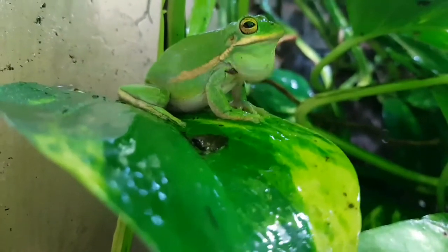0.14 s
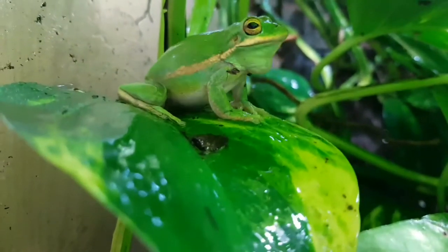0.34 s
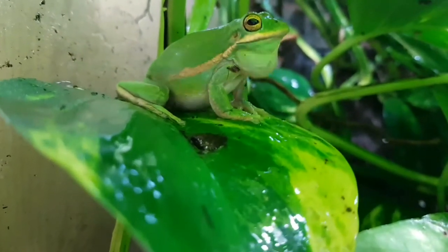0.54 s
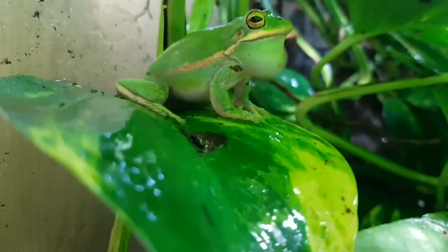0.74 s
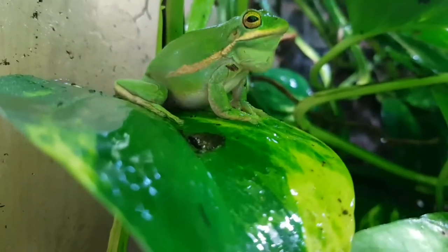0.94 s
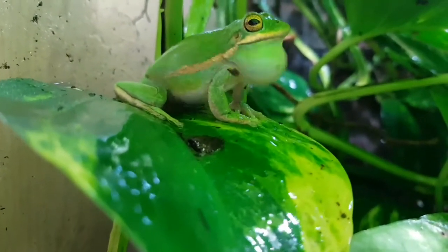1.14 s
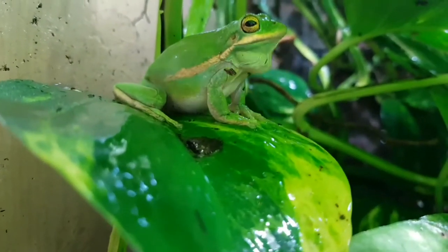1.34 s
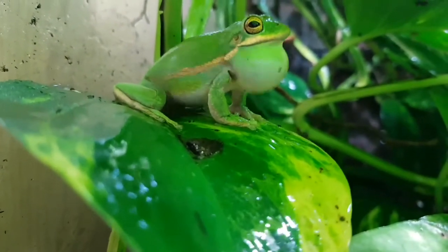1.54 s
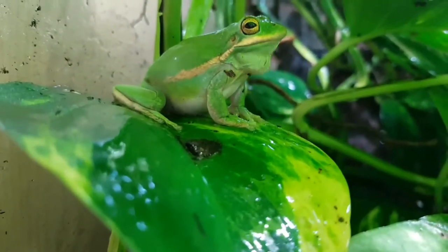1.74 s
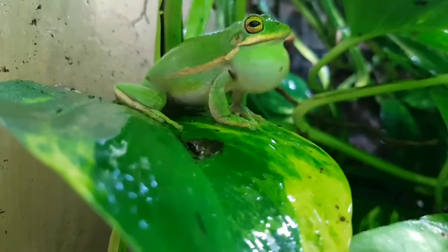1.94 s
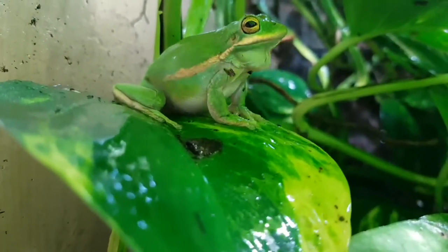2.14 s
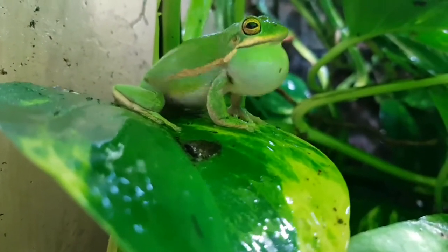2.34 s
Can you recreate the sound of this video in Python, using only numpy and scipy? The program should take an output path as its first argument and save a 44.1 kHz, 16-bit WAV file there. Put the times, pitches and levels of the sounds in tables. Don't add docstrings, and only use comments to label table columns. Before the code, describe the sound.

A single tree frog close to a stereo microphone gives six short, loud, rough barks, evenly spaced, each preceded by a faint throat click, with a thin tail from nearby walls and a quiet low floor.

```python
import sys
import numpy as np
from scipy import signal
from scipy.fft import rfft, irfft
from scipy.io import wavfile
from scipy.ndimage import uniform_filter1d, minimum_filter1d

SR = 44100
rng = np.random.default_rng(int(sys.argv[2]) if len(sys.argv) > 2 else 0)


def master_out(mix):
    frames = np.transpose(np.atleast_2d(mix))
    ceiling = np.clip(frames, -1, 1)
    pcm = np.round(ceiling * 32767).astype(np.int16)
    wavfile.write(sys.argv[1], SR, pcm)


def volts_from_decibels(level):
    exponent = np.asarray(level, float) / 20
    return 10 ** exponent


N = 105840
LEAD = SR // 2

# start in [s], length in [s], effort in [dB], top pulse rate in [Hz],
# time into the bark when the upper band drops in [s].
BARKS = [
    (0.1369, .070, -11, 397, 0.055),
    (0.5221, .073, -10.5, 459.2, .041),
    (0.8983, 0.074, -10, 461, .048),
    (1.2828, 0.08, -11.5, 450, 0.058),
    (1.6713, 0.085, -11, 458, 0.0565),
    (2.0704, 0.08, -11, 478.5, .052),
]
# start in [s], peak in [dB].
THROAT_CLICKS = [
    (.115, -38),
    (.119, -41),
    (.5023, -37),
    (.506, -43),
    (.880, -37),
    (1.266, -42),
    (1.271, -36),
    (1.6523, -37),
    (2.050, -37),
]
# start in [s], peak in [dB].
LEAF_TICKS = [
    (0.438, -48.5),
    (1.986, -57.5),
]
# centre in [Hz], width in [Hz], level in [dB].
LOW_MODES = [(510, 120, -23.5), (666, 190, -20), (988.4, 170.3, 0.27), (1120.4, 153, -3), (1315, 174, -2),
             (1476.6, 175, -6)]
# centre in [Hz], width in [Hz], level in [dB].
UPPER_MODES = [(1818, 246, 1), (2034, 128, -4), (2176, 258, -3.7), (2326, 160, 0.4)]
# centre in [Hz], width in [Hz], level in [dB].
SHRILL_MODES = [(2645, 170, -9), (2982, 300, -10), (3340, 360, -16.5), (3817, 310, -21.5), (4275, 350, -26),
                (5033, 432, -23), (5982, 500, -27.5), (7376, 510, -42), (8950, 570, -41)]
# frequency in [Hz], gain in [dB].
SAC_RADIATION = [(100, -37), (300, -13.5), (500, -3.5), (800, 0.32), (6200, -2.37), (6700, -11), (7300, -6),
                 (9000, -8)]
# centre in [Hz], width in [Hz], depth in [0-1].
LEAF_NOTCHES = [(1610, 150, .75), (4790, 190, 0.5)]
# delay in [s], level in [dB].
NEAR_ECHOES = [(.0023, -19), (.0051, -22), (.0094, -21), (.015, -20.5), (.023, -22.5)]
# delay in [s], level in [dB].
SIDE_ECHOES = [(.0017, -18.5), (.0031, -14)]
# frequency in [Hz], lead of the left in [radians].
PORT_PHASE = [(100, 0.17), (700, 1.15), (2400, 1), (2800, 2.9), (3500, 4.44), (4500, 6.5), (6200, 16.2),
              (16000, 30)]
# frequency in [Hz], left over right in [dB].
PORT_BALANCE = [(60, 0.5), (150, 2), (380, -3.5), (950, 1), (2380, -4.5), (5980, -3.5), (15000, -1)]
# frequency in [Hz], time to fall 60 dB in [s].
ROOM_DECAY = [(400, 0.58), (1000, 0.47), (2000, 0.47), (3500, 0.43), (6000, 0.42), (10000, 0.22)]
# frequency in [Hz], level in [dB].
ROOM_COLOUR = [(400, 4.6), (1000, 0.5), (1500, 1.5), (2000, -.5), (3500, -5.5), (6000, 0.5), (10000, -5.5)]
# frequency in [Hz], density in [dB per Hz].
FLOOR_COLOUR = [(15, -27.5), (40, -11), (70, -6.5), (115, -2.5), (250, -10.5), (1000, -12.5), (5000, -30.5),
                (15000, -30)]
# frequency in [Hz], likeness in [0-1].
FLOOR_LIKENESS = [(30, .82), (200, .65), (600, .4), (3000, .2), (12000, .1)]


def evened(x):
    return x / np.sqrt(np.mean(x ** 2) + 1e-20)


def read(points, hz):
    f, value = np.transpose(points)
    return np.interp(np.log(hz + 1), np.log(f + 1), value)


def step(t, at, span):
    return .5 + .5 * np.tanh((t - at) / span)


def resonate(x, hz, width):
    turn = np.exp(2j * np.pi * np.cumsum(hz * np.ones(x.shape[-1])) / SR)
    r = np.exp(-np.pi * width / SR)
    smooth = signal.lfilter([(1 - r) ** 2], [1, -2 * r, r * r], x / turn)
    return 2 * (turn * smooth).real


def ring(x, modes):
    return sum((-1) ** k * volts_from_decibels(db) * resonate(x, hz, width) for k, (hz, width, db) in enumerate(modes))


def folds(t, rate_hz):
    wander_depth, jitter, shimmer_db, breath = .16, .08, 2.2, .15
    start_rate, rise_s, end_sag = .8, .015, .18
    draws = rng.standard_normal((80, 4))
    air_noise = rng.standard_normal((8000, 2))[:len(t)].T
    wander = evened(uniform_filter1d(draws[:, 0], size=6))
    law = start_rate + (1 - start_rate) * np.minimum(t / rise_s, 1) - end_sag * (t / t[-1]) ** 2
    gaps = np.clip(1 + wander_depth * wander + jitter * draws[:, 1], .3, 3)
    at = np.searchsorted(np.cumsum(rate_hz * law) / SR, np.cumsum(gaps) - gaps[0])
    keep = at < len(t)
    pulses = np.zeros((2, len(t)))
    pulses[:, at[keep]] = volts_from_decibels(shimmer_db * draws[keep, 2:].T)
    pulses[:, 0] = volts_from_decibels(4)
    puffs = signal.lfilter([1], [1, -.98], pulses) * air_noise
    return (1 - breath) * evened(pulses) + breath * evened(puffs)


def favour(x, start_hz, end_hz, u, width_hz, gain):
    return x + gain * resonate(x, start_hz + (end_hz - start_hz) * u, width_hz)


def bark(length, effort_db, rate_hz, drop_s):
    t = np.arange(0, length + 0.084, 1 / SR)
    u = np.minimum(t / length, 1)
    unswollen = 1 - step(t, 0.013, 0.0017)
    effort = volts_from_decibels(-3.5 * unswollen - 5 * ((u - 0.41) * 2) ** 2)
    low, high = folds(t, rate_hz) * (1 - step(t, length, .002)) * effort
    upper = volts_from_decibels(0.27 - 13.5 * unswollen - 9.5 * step(t, drop_s, 0.0025))
    snap_db, snap_s = 3, .004
    shrill_db = -5 * (1 - np.minimum(u / 0.35, 1)) + snap_db * step(t, length - 2 * snap_s, snap_s / 2)
    sound = ring(favour(low, 1311, 956, u, 260, 1.2), LOW_MODES)
    sound = sound + ring(upper * favour(high, 1764, 2324, u, 280, 2.2), UPPER_MODES)
    sound = evened(sound + ring(volts_from_decibels(3.5) * volts_from_decibels(shrill_db) * high, SHRILL_MODES))
    onset = np.minimum(t / 0.00026, 1)
    return volts_from_decibels(effort_db - 2.5) * onset * sound


def click(db, share_db):
    t = np.arange(1500) / SR
    smack = np.exp(-t / 0.0022) * rng.standard_normal(len(t)) * .08 + (t == 0)
    bands = zip(share_db, (LOW_MODES, UPPER_MODES, SHRILL_MODES))
    sound = sum(volts_from_decibels(g) * ring(smack, modes) for g, modes in bands)
    return volts_from_decibels(db) * sound / abs(sound).max()


def frog():
    out = np.zeros(N + 2 * LEAD)
    sounds = [(row[0], bark(*row[1:])) for row in BARKS]
    sounds += [(s, click(db, (0.1, 1.5, 11))) for s, db in THROAT_CLICKS]
    sounds += [(s, click(db, (-8, 0.1, 20.5))) for s, db in LEAF_TICKS]
    sounds += [(-0.27, bark(0.092, -11.5, 450, 0.04))]
    for s, sound in sounds:
        at = LEAD + round(s * SR)
        out[at:at + len(sound)] += sound
    return out[:N + LEAD]


def radiate(x):
    folded = irfft(np.log(volts_from_decibels(read(SAC_RADIATION, np.fft.rfftfreq(4096, 1 / SR)))))[:2049]
    folded[1:-1] *= 2
    return signal.oaconvolve(x, irfft(np.exp(rfft(folded, 4096))))[:len(x)]


def air():
    t = np.arange(N) / SR
    gate = np.zeros(N)
    for s, length, effort_db, *_ in BARKS:
        puff = volts_from_decibels(effort_db + 4.5 * np.exp(-abs(t - s) / .008))
        gate += puff * (t > s) * (1 - step(t, s + length, .002))
    a, b, shared = resonate(rng.standard_normal((3, N)), 11500, 11000)
    return volts_from_decibels(-51.5) * gate * evened(np.array([a + 0.94 * shared, b - 0.87 * shared]))


def leaf_shadow(x):
    for hz, width, depth in LEAF_NOTCHES:
        x = x - np.clip(depth, 0, 1) * resonate(x, hz, width)
    return x


def echo(hz, delay_s, db):
    return volts_from_decibels(db) * np.exp(-2j * np.pi * hz * delay_s)


def ports(x):
    hz = np.fft.rfftfreq(len(x), 1 / SR)
    near = 1 + sum(echo(hz, *e) for e in NEAR_ECHOES)
    side = np.array([echo(hz, *e) for e in SIDE_ECHOES])
    near = near + side * np.minimum(hz / 4000, 1)
    half = volts_from_decibels(read(PORT_BALANCE, hz) / 2) * np.exp(.5j * read(PORT_PHASE, hz))
    return irfft(rfft(x) * near * np.array([half, 1 / half]), len(x))


def room(x):
    taps = np.zeros((3, SR))
    slots = np.arange(300, SR - 20, 20)
    at = slots + rng.integers(0, 20, (3, len(slots)))
    np.put_along_axis(taps, at, rng.choice([-1., 1.], at.shape), 1)
    hz, t, z = signal.stft(taps[:2] + 0.13 * taps[2], SR, nperseg=256)
    z = z * volts_from_decibels(read(ROOM_COLOUR, hz)[:, None] - 60 * t / read(ROOM_DECAY, hz)[:, None])
    tail = signal.istft(z, SR, nperseg=256)[1]
    tail = tail / np.linalg.norm(tail[0])
    return volts_from_decibels(-24) * signal.fftconvolve(x[None], tail, axes=1)[:, :len(x)]


def floor():
    frames, hz = N // 256 + 5, np.fft.rfftfreq(1024, 1 / SR)
    a, b, c, d, patches = rng.standard_normal((frames, 513, 5)).T
    patches = uniform_filter1d(patches, size=8, axis=0)
    patches = evened(uniform_filter1d(patches, size=12, axis=1))
    same = np.clip(read(FLOOR_LIKENESS, hz), -1, 1)[:, None]
    left = a + 1j * b
    z = np.array([left, same * left + np.sqrt(1 - same ** 2) * (c + 1j * d)])
    z *= volts_from_decibels(read(FLOOR_COLOUR, hz)[:, None] + 1.5 * patches)
    noise = evened(signal.istft(z, nperseg=1024, noverlap=768)[1][:, :N])
    return volts_from_decibels(-65) * volts_from_decibels(np.array([[-.6], [.6]])) * noise


def scene():
    voice = radiate(frog())
    direct = ports(leaf_shadow(voice))
    return (direct + room(voice))[:, LEAD:] + air() + floor()


def low_pass(x):
    return signal.sosfilt(signal.butter(12, 16480, fs=SR, output="sos"), x)


def record(dry):
    ceiling, span = .9, round(.004 * SR)
    gain = np.minimum(ceiling / (abs(dry).max(0) + 1e-9), 1)
    gain = minimum_filter1d(gain, 2 * span + 1)
    gain = uniform_filter1d(uniform_filter1d(gain, span), span)
    held = signal.oaconvolve(dry * gain, signal.firwin(255, 15600, fs=SR)[None], "same")
    return low_pass(held)


dry = scene()
out = record(dry)
master_out(out)
```